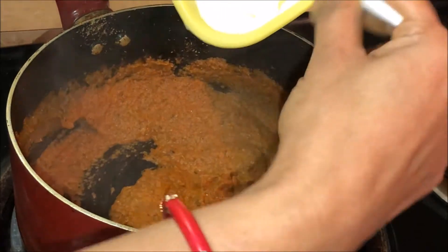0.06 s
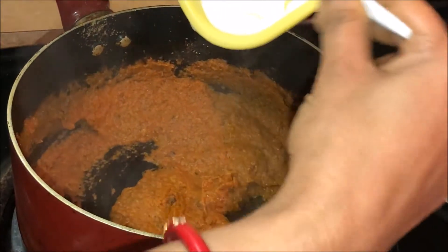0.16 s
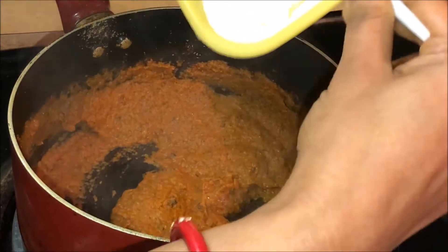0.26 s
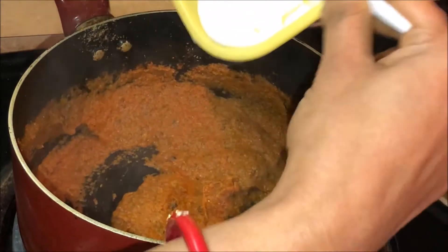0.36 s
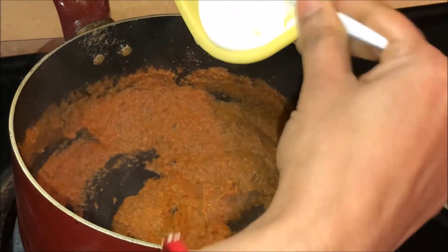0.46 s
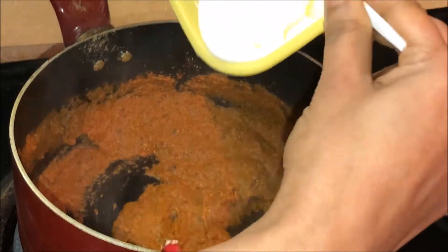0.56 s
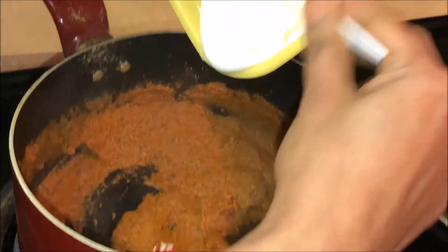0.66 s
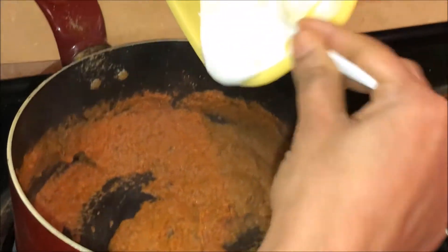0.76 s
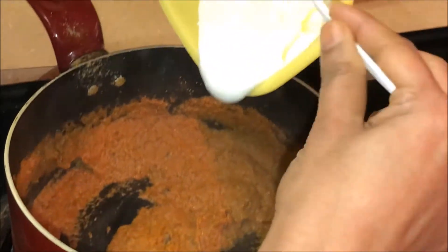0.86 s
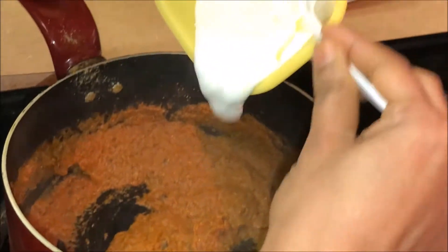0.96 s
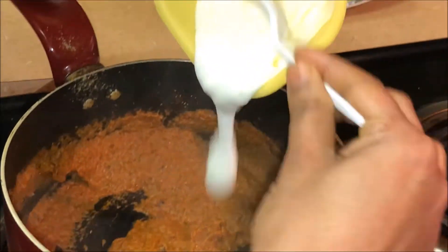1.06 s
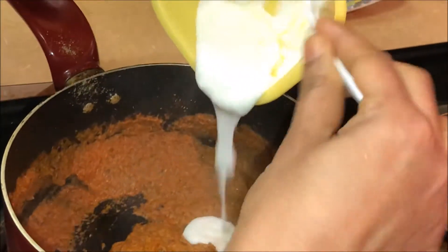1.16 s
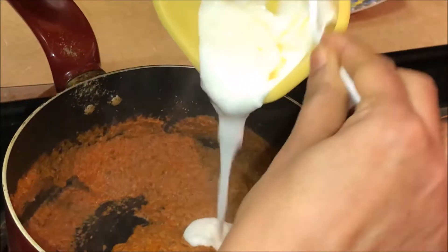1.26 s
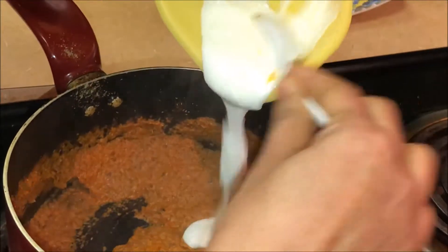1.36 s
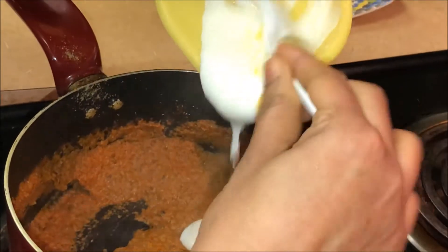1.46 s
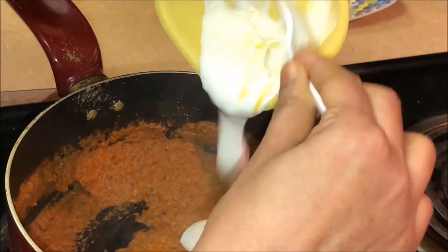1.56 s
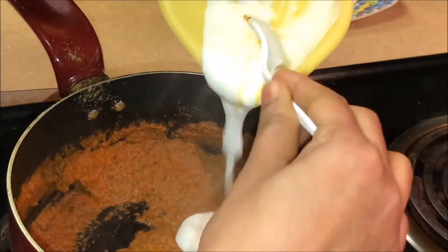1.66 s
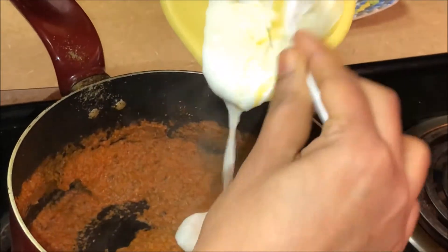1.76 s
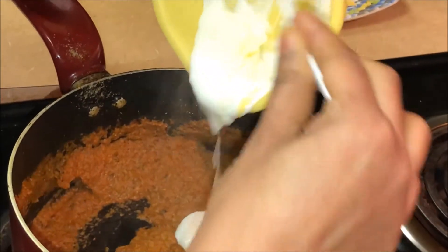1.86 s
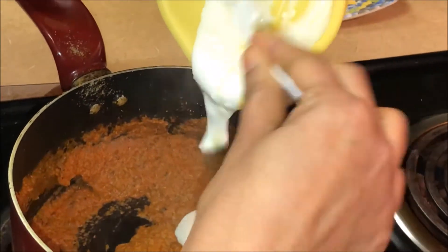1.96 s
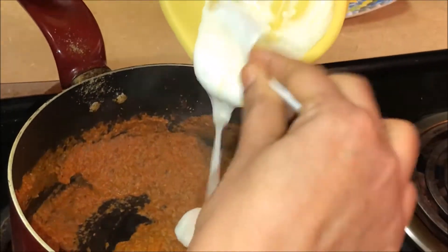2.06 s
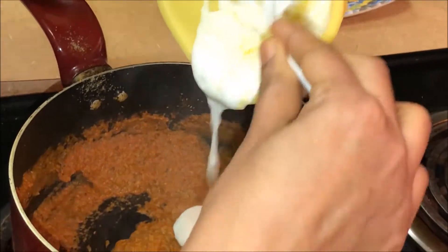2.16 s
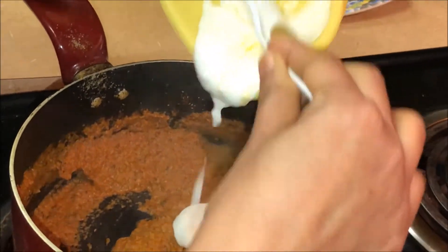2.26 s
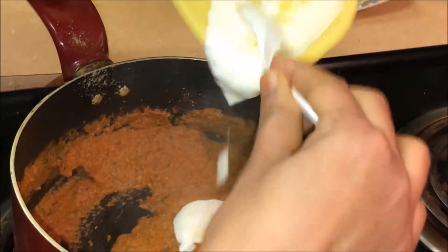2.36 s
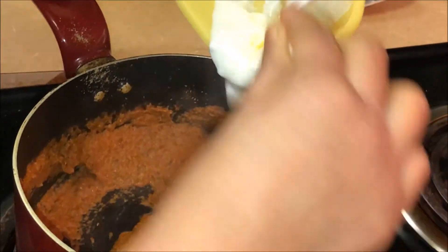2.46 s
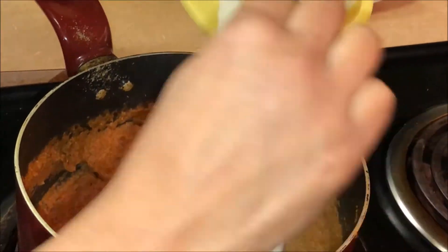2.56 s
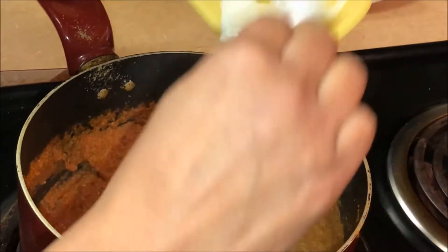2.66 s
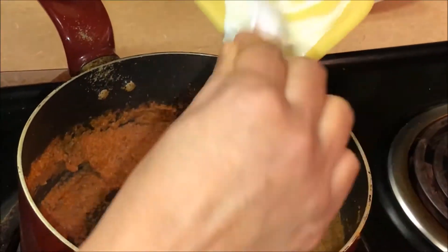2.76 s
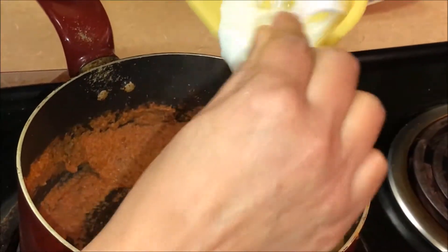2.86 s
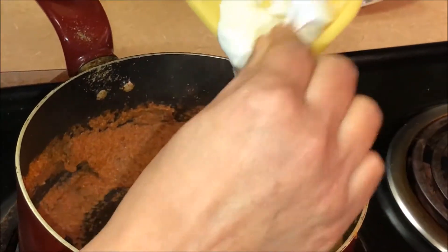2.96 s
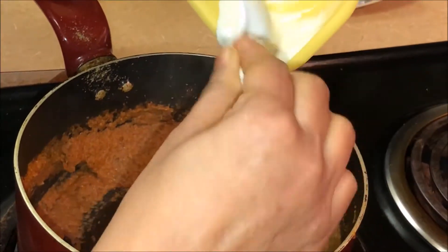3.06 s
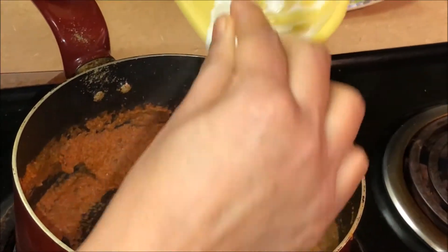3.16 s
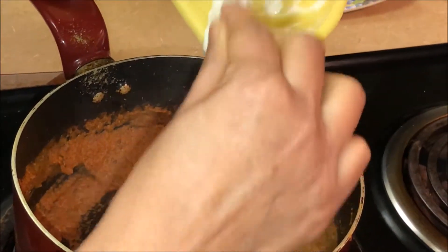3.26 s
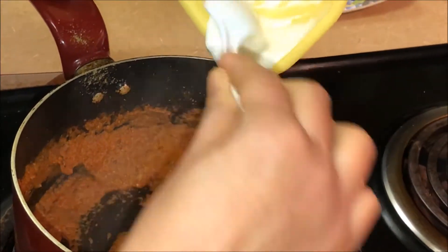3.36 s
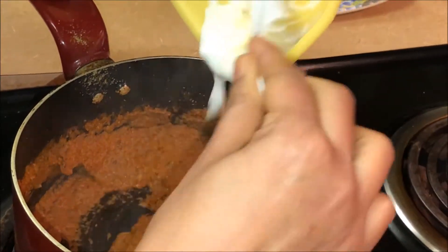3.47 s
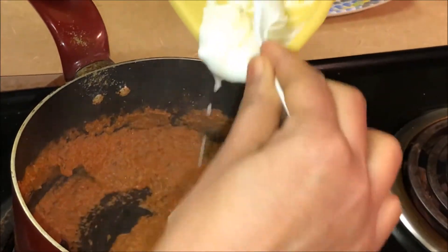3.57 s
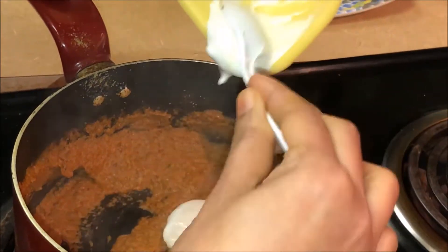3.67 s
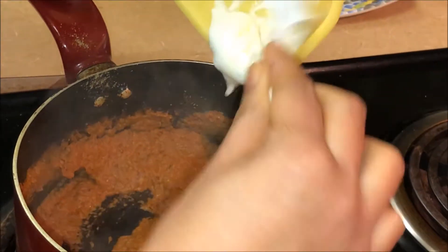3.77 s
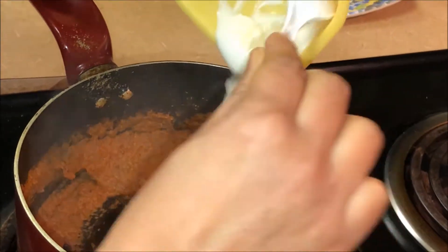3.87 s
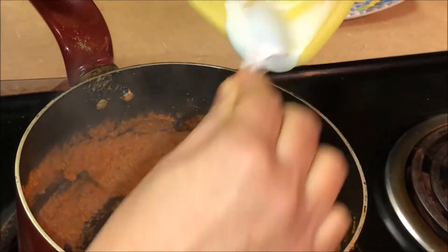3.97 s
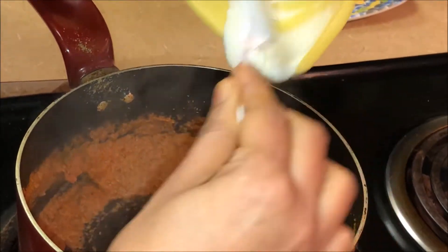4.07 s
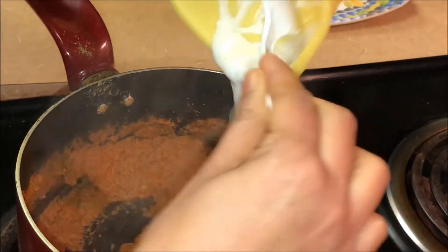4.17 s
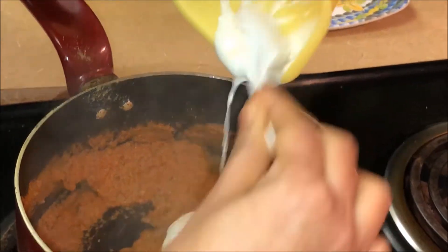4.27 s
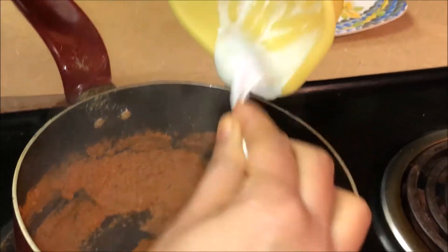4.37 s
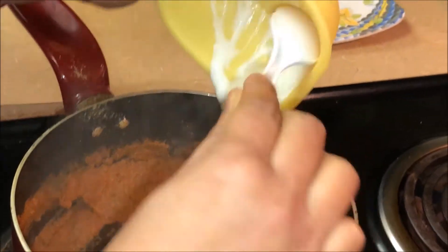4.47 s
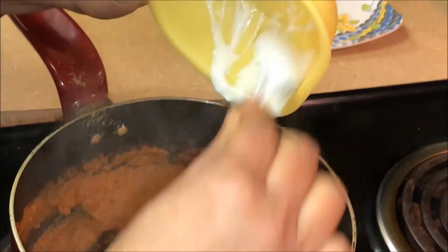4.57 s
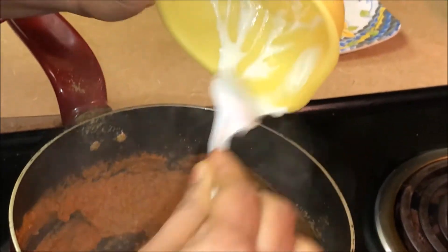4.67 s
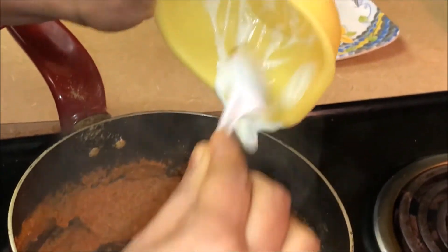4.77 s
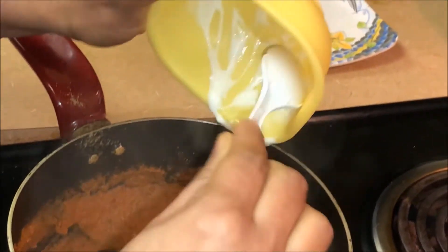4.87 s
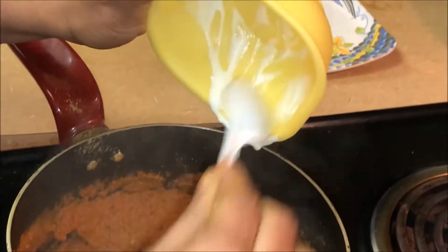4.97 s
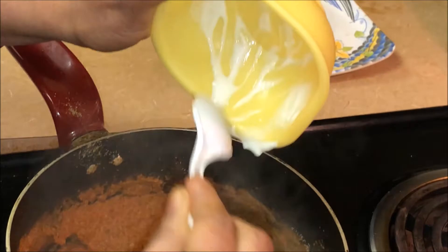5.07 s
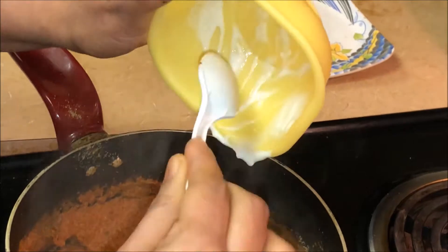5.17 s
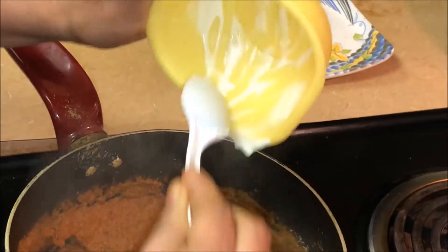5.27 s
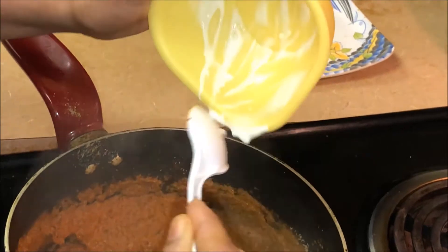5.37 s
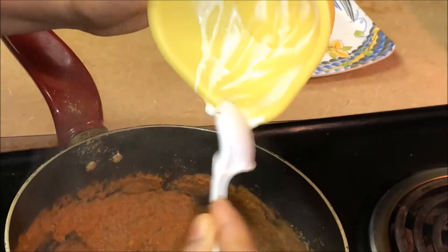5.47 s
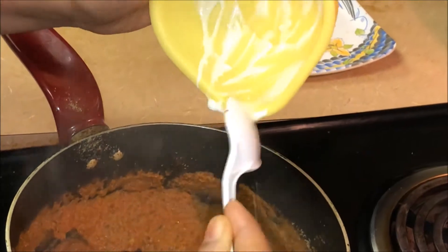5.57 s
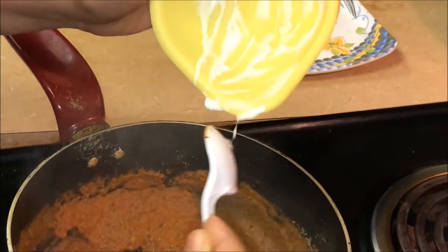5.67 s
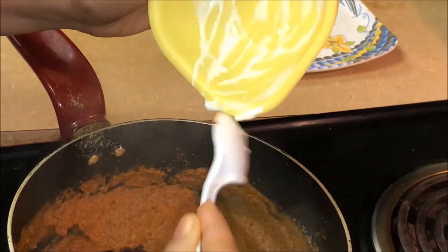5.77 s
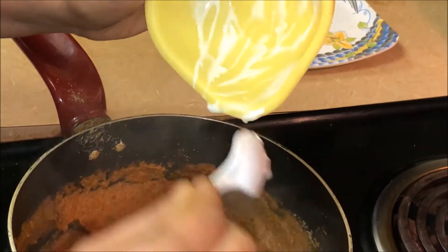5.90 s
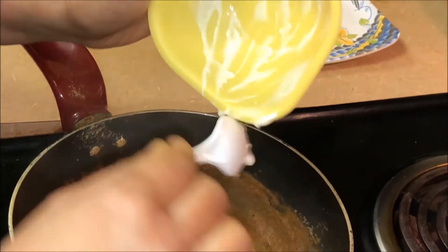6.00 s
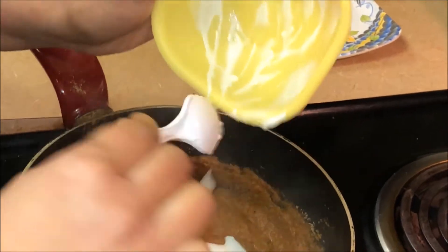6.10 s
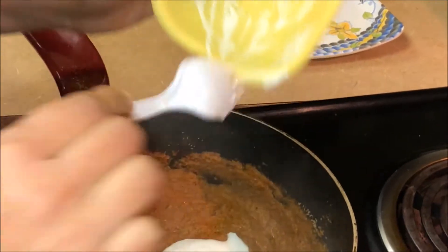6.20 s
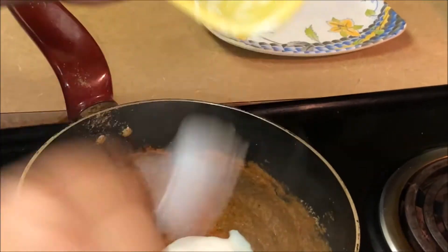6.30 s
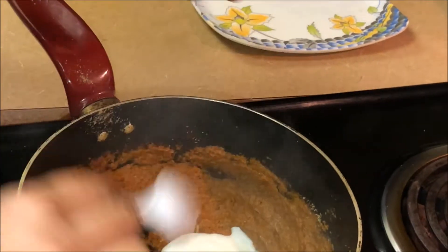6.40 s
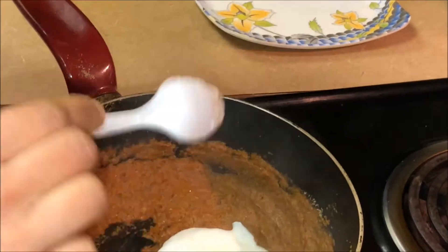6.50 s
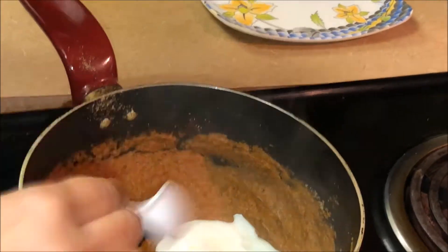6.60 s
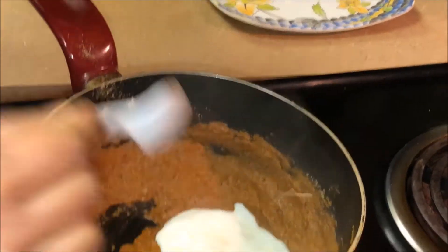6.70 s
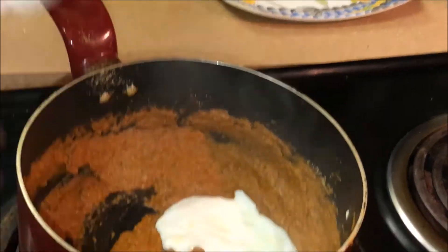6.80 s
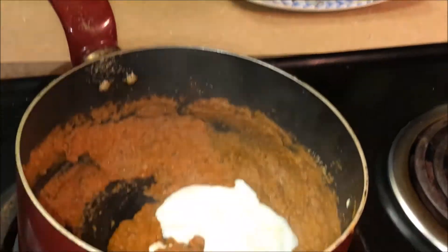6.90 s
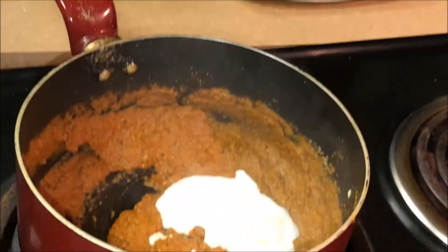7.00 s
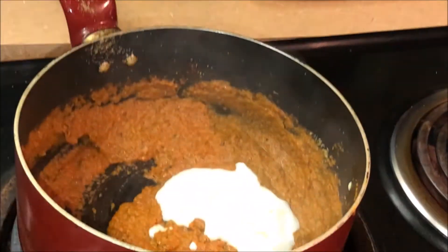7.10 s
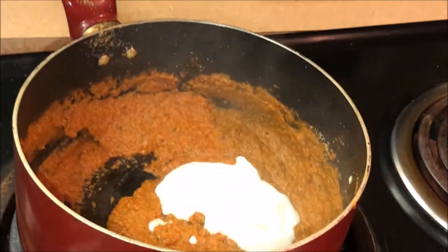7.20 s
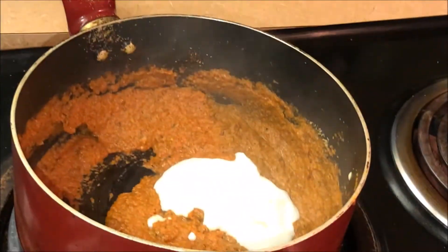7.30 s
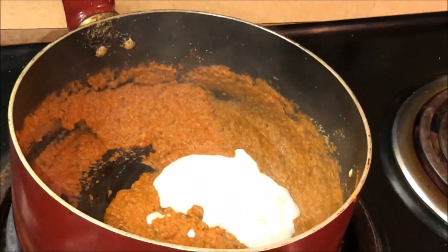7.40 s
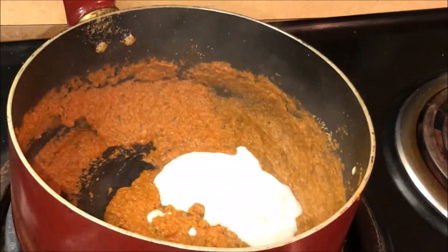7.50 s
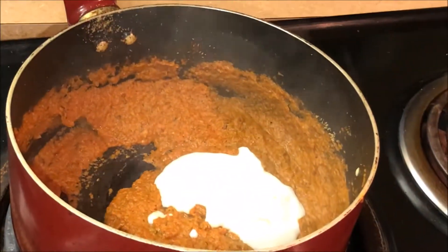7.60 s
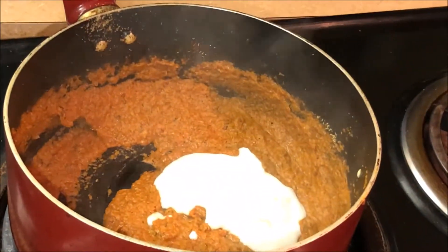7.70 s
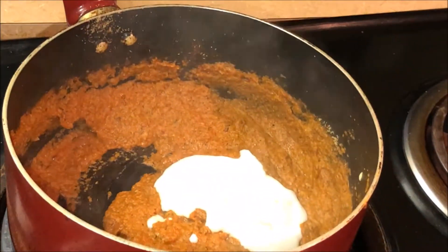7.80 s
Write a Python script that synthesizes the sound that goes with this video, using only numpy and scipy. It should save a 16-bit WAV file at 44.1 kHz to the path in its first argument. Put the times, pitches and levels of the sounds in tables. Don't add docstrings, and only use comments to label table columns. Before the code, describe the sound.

Spoon on plastic tub, recorded near with a phone microphone: quick hollow knocks, dry little scrapes, wet hissy smears and a tiny squeak near five seconds. Thick lumps plop softly into a pan. Hands and sleeve rustle low at first. After six seconds the scraping stops, leaving faint simmer, appliance hum and a small cluster of taps just after seven. Short bright kitchen reflections.

```python
import sys
import numpy as np
from scipy import signal
from scipy.fft import rfft, irfft, next_fast_len
from scipy.io import wavfile
from scipy.ndimage import uniform_filter1d

SR = 44100
rng = np.random.default_rng(int(sys.argv[2]) if len(sys.argv) > 2 else 0)


def undo_db(level):
    steps = np.asarray(level, float) / 20
    return 10 ** steps


def bounce(signal):
    frames = np.transpose(np.atleast_2d(signal))
    limited = np.clip(frames, -1, 1)
    pcm = np.round(limited * 32767).astype(np.int16)
    wavfile.write(sys.argv[1], SR, pcm)


N = 345992


def evened(x):
    return x / np.sqrt(np.mean(x ** 2) + 1e-20)


def slow_wander(count, size):
    return evened(uniform_filter1d(rng.standard_normal(count), size=size))


def read(points, hz):
    f, value = np.transpose(points)
    return np.interp(np.log(hz + 1), np.log(f + 1), value)


def curve(rows):
    return np.interp(np.arange(N) / SR, *np.transpose(rows))


def add(mix, s, sound):
    part = mix[round(s * SR):][:len(sound)]
    part += sound[:len(part)]


def resonate(x, hz, width):
    turn = np.exp(2j * np.pi * np.cumsum(hz * np.ones(len(x))) / SR)
    r = np.exp(-np.pi * width / SR)
    smooth = signal.lfilter([1 - r], [1, -r], x / turn + 1e-18)
    return 2 * (turn * smooth).real


def highs(x, hz, order=2):
    return signal.sosfilt(signal.butter(order, hz, "high", fs=SR, output="sos"), x)


# start_s, hollow_peak_db, hollow_hz, strongest_wall_hz, wall_db
CLICKS = [(0.3644, -34, 1450, 3500, -56), (0.6234, -36.5, 1280, 4830, -40),
          (0.7518, -32.5, 1410, 5400, -44), (0.9079, -28, 1580, 5500, -37),
          (1.2356, -32.5, 1380, 3130, -39), (1.4068, -46, 1390, 6420, -48), (1.919, -46, 1190, 6250, -43.5),
          (2.6548, -31, 1380, 3220, -45.5), (3.8579, -18, 1428, 6540, -34.5),
          (3.9887, -23, 1490, 2900, -39.5), (4.217, -29, 1260, 2970, -36.5),
          (4.531, -22, 1440, 2850, -35.5), (4.921, -15.5, 1430, 2920, -32.5),
          (5.548, -30.5, 1420, 3200, -48), (7.134, -44, 1330, 3890, -44.5)]
# start_s, hollow_peak_db, hollow_hz, strongest_wall_hz, wall_db
SLAPS = [(0.2963, -38, 1550, 3950, -47), (.3407, -58, 1270, 5000, -48), (0.3884, -43, 1400, 5300, -47),
         (0.7222, -32, 1370, 3300, -48), (1.4347, -29, 1356, 3210, -33), (1.5711, -34.5, 1580, 3180, -38.5),
         (1.6598, -21.5, 1380, 4700, -31), (1.8786, -30, 1330, 3400, -35), (2.0014, -35, 1370, 5380, -33.5),
         (2.2445, -29, 1490, 3300, -30), (2.3189, -23, 1380, 5800, -28), (2.684, -43, 1390, 3280, -60),
         (2.7265, -26, 1435, 3050, -40), (2.946, -24.5, 1267, 2700, -36), (3.0435, -37, 1600, 5100, -51),
         (3.3374, -31, 1270, 2680, -45), (4.2436, -22, 1330, 2930, -29.5), (5.2851, -15, 1380, 4400, -14),
         (5.6708, -28.5, 1090, 3280, -36), (5.8302, -36.5, 1410, 2950, -50),
         (6.107, -35.5, 1270, 5560, -41.5), (7.121, -30.5, 1180, 5940, -36)]
# start_s, hollow_peak_db, hollow_hz, strongest_wall_hz, wall_db
KNOCKS = [(0.0929, -38, 1400, 4030, -50), (0.408, -38, 1410, 5400, -41), (.6666, -33, 1350, 2840, -40.5),
          (0.983, -21.5, 1485, 3250, -26.5), (1.0565, -27, 1480, 3900, -33), (1.951, -22, 1440, 4200, -31),
          (2.0118, -35, 1390, 3200, -35), (2.3978, -26, 1250, 3000, -40), (2.4062, -29.5, 1430, 4800, -31),
          (3.327, -45, 1450, 2400, -53), (3.5599, -28, 1310, 3200, -29), (3.6274, -19, 1386, 5400, -21),
          (3.7224, -31, 1380, 3600, -52), (4.7438, -23, 1420, 4600, -35), (5.0942, -25.5, 1480, 3110, -31),
          (5.384, -34, 1300, 3900, -36), (7.0933, -35.5, 1190, 5140, -38.5)]
# start_s,
# hollow_peak_db, hollow_hz, strongest_wall_hz, wall_db
PINGS = [(1.202, -60, 1500, 6500, -52), (1.668, -31, 1450, 5600, -44), (2.206, -60, 1400, 2800, -52),
         (3.612, -46, 1300, 3800, -48), (3.744, -38, 1300, 3500, -52), (4.638, -30, 1450, 3100, -52),
         (6.099, -42, 1300, 3200, -52), (6.116, -36, 1350, 3200, -48), (2.2475, -34, 1600, 3800, -37),
         (2.776, -42, 1350, 2700, -58), (6.7, -62, 1500, 4800, -60), (.087, -46, 1400, 3500, -50),
         (5.2853, -40, 1400, 3150, -17), (1.9512, -40, 1440, 2900, -22), (3.628, -40, 1400, 3800, -23),
         (6.142, -50, 1350, 3200, -50), (.375, -44, 1450, 4000, -60), (2.7268, -36, 1650, 2700, -37),
         (1.046, -21, 1470, 3300, -34), (1.052, -18, 1450, 3700, -30), (3.352, -33, 1500, 2900, -46),
         (3.3595, -31, 1450, 2900, -46), (4.7345, -29, 1340, 2850, -33), (4.744, -40, 1420, 3050, -27),
         (4.643, -33, 1500, 3100, -52)]
# start_s, hollow_peak_db, hollow_hz, wall_db
NUDGES = [(.0074, -38.5, 1560, -67), (1.3764, -36, 1280, -52), (2.563, -35, 1230, -54),
          (2.809, -67, 1340, -47.5), (2.9758, -37.5, 1370, -56), (3.125, -43.5, 1410, -55),
          (3.279, -30.5, 1290, -47.5), (3.3029, -46, 1420, -53), (4.0839, -44, 1630, -43.5),
          (4.3865, -31, 1390, -42.5), (5.6367, -45, 1520, -60), (5.663, -32, 1430, -46),
          (6.0356, -53.5, 1210, -57), (6.142, -33.5, 1360, -49), (7.813, -49, 1600, -58)]
CLICK_TICK_DB, SLAP_TICK_DB, KNOCK_TICK_DB = 4.5, -4.5, -25
NUDGE_WALL_HZ = 2950
SOFT_FOCUS_DB = -12


def touches():
    rows = [(*r, r[-1] + CLICK_TICK_DB, 0) for r in CLICKS]
    rows += [(*r, r[-1] + SLAP_TICK_DB, 0) for r in SLAPS]
    rows += [(*r, r[-1] + KNOCK_TICK_DB, 0) for r in KNOCKS]
    rows += [(*r, r[-1] + KNOCK_TICK_DB, SOFT_FOCUS_DB) for r in PINGS]
    for s, hollow_db, hollow_hz, wall_db in NUDGES:
        rows.append((s, hollow_db, hollow_hz, NUDGE_WALL_HZ, wall_db, wall_db + KNOCK_TICK_DB, SOFT_FOCUS_DB))
    return rows


def tick_colour(x):
    softened = signal.lfilter([1], [1, -.8], signal.lfilter([1], [1, -.8], x))
    return evened(highs(softened, 6100))


# pitch_hz, width_hz, level_db
WALLS = [(3110, 410, -4), (4110, 360, -5.5), (5600, 340, -6.5), (6330, 190, -19), (6670, 640, -41),
         (8900, 700, -29)]
# time_s, level_under_hollow_db
THUD = [(0, -30), (2.6, -18), (4.3, -25.5), (5.0, -34), (5.28, -46), (5.6, -22.5), (7.8, -20)]
TICK_TOP_DB = -27.5
CUSHION_S_PER_DB, HARD_DB = .00005, -24


def taps():
    out, t = np.zeros(N), np.arange(1800) / SR
    hz, width, db = np.transpose(WALLS)
    modes = len(hz)
    rows = touches()
    chance = rng.random((len(rows), 2 * modes + 4))
    grit = rng.standard_normal((len(rows), 2, len(t)))
    for row, luck, noise in zip(rows, chance, grit):
        s, hollow_db, hollow_hz, wall_hz, wall_db, tick_db, others_db = row
        swell = t / 0.0014
        hollow = np.sin(2 * np.pi * (hollow_hz * t + luck[-1]))
        second_hz = hollow_hz * (1.143 + 0.174 * luck[-2])
        hollow += 0.24 * np.sin(2 * np.pi * (second_hz * t + luck[-3]))
        hollow = highs((swell * np.exp(1 - swell)) ** 2 * hollow, 1120, order=8)

        f = np.append(hz * (1.0 + 0.018 * luck[:modes]), wall_hz)[:, None]
        distance = abs(np.log2(hz / wall_hz))
        mode_db = db + others_db + 1.5 - 3 * distance + 3.5 * luck[modes:-4]
        gain = undo_db(np.append(mode_db, 3.5))[:, None]
        fade = np.exp(-np.pi * np.append(width, 380)[:, None] * .74 * t)
        phase = 0.26 * luck[modes:-3, None]
        wall = (gain * fade * np.sin(2 * np.pi * (f * t + phase))).sum(0)
        wall *= 1 - np.exp(-t / (.0001 + CUSHION_S_PER_DB * max(HARD_DB - wall_db, 0)))

        crack = evened(resonate(highs(noise[0], 1200), 3270, 2100))
        crack *= np.exp(-t / 0.0051) + 0.062 * np.exp(-t / 0.024)
        wall = highs(wall / abs(wall).max() + 0.127 * crack, 1340, order=4)
        tick = tick_colour(noise[1]) * (np.exp(-t / 0.00065) + 0.33 * np.exp(-t / 0.0049))
        thud = 1.6 * np.exp(-t / 0.0011) * np.sin(2 * np.pi * 480 * t)
        thud += 1.6 * np.exp(-t / 0.0032) * np.sin(2 * np.pi * 870 * t)

        touch = undo_db(hollow_db) * (hollow + undo_db(np.interp(s, *np.transpose(THUD))) * thud)
        touch += undo_db(wall_db + 11 + .45 * others_db) * wall
        touch += undo_db(min(tick_db, TICK_TOP_DB) + 7) * tick
        add(out, s, touch)
    return out


def slips(count):
    clumps = undo_db(2.66 * slow_wander(count, 250))
    grains = rng.standard_normal(count) * undo_db(0.35 * np.minimum(rng.exponential(1, count), 3))
    grains *= rng.random(count) < 2500 / SR
    return clumps * (evened(grains) + 1.5 * rng.standard_normal(count))


def tub(drive, pitch, shift, wall_hz):
    hollow = resonate(resonate(drive, pitch, 450), pitch, 450) + 0.19 * resonate(drive, 1.3 * pitch, 240)
    walls = 0.9 * resonate(resonate(drive, wall_hz, 500), wall_hz, 500) + 0.068 * highs(drive, 2400)
    for f, width, db in WALLS:
        ring = resonate(resonate(drive, f * shift, 2.2 * width), f * shift, 2.2 * width)
        walls = walls + undo_db(0.43 * db) * ring
    film = highs(signal.lfilter([1], [1, -.6], drive), 4500)
    return evened(highs(hollow, 1060, order=8)), evened(walls), evened(film)


# time_s, pitch_hz
HOLLOW = [(0, 1350), (1.04, 1576), (1.3, 1396), (3.4, 1334), (3.9, 1450), (4.33, 1330), (4.6, 1440),
          (5.1, 1510), (5.7, 1400), (6.0, 1240), (7.14, 1257), (7.3, 1390), (7.85, 1490)]
# most_pressure_s, level_db, length_s
STROKES = [(.01, -49.5, 0.25), (0.663, -69.5, 0.082), (1.095, -56.5, 0.36), (1.37, -53, 0.22),
           (1.675, -50.5, 0.17), (2.04, -55, 0.099), (2.496, -81, 0.42), (3.029, -51.5, 0.088),
           (3.369, -49.5, 0.09), (3.692, -51, 0.12), (4.001, -48.5, 0.12), (4.346, -44.5, 0.068),
           (4.634, -46.5, 0.14), (5.05, -51, 0.13), (5.4, -55, 0.13), (5.67, -71, 0.12),
           (7.192, -56.5, 0.23), (7.82, -66, 0.2)]
LEAN_IN, LET_GO = 0.25, 0.33
STROKE_HOLLOW_DB, STROKE_HISS_DB = -3.5, -40
REST_DB, REST_HOLLOW_DB, REST_HISS_DB = -69, 2, 3.5
LIFT_S, LIFTED_DB = 5.4, -1


def drag():
    t = np.arange(N) / SR
    push = np.zeros(N)
    for s, db, length in STROKES:
        away = np.maximum((s - t) / LEAN_IN, (t - s) / LET_GO)
        push += undo_db(db) * np.exp(-away / length)
    rest = undo_db(REST_DB + LIFTED_DB * (t > LIFT_S))
    wander = slow_wander(N, 3500)
    pitch = curve(HOLLOW) * (1 + 0.085 * wander)
    hollow, walls, hiss = tub(slips(N), pitch, 1 + 0.08 * wander[::-1], 3600 + 300 * wander)
    out = (rest * undo_db(REST_HOLLOW_DB) + push * undo_db(STROKE_HOLLOW_DB)) * hollow
    out += (rest + push) * walls
    return out + (undo_db(REST_DB + REST_HISS_DB) + push * undo_db(STROKE_HISS_DB)) * hiss


# start_s, hollow_db, wall_db, length_s, strongest_wall_hz
JUDDERS = [(0.062, -48, -34.5, 0.054, 5000), (0.393, -45, -34.5, 0.056, 3300),
           (0.455, -45, -34, 0.052, 5500), (1.0403, -16, -13, .028, 3800), (1.05, -11, -13, 0.017, 3400),
           (1.054, -22, -31, .015, 5300), (1.659, -30, -34, 0.021, 4700), (1.924, -40, -36, 0.066, 4600),
           (2.074, -43, -35.5, 0.047, 5100), (2.291, -38, -32, .052, 3000), (2.306, -40, -22, .016, 6000),
           (2.389, -34, -30, 0.041, 5000), (3.345, -31, -33.5, 0.038, 2600), (3.372, -55, -36, 0.08, 3700),
           (3.692, -55, -35, 0.088, 3700), (4.306, -52, -28, .043, 4400), (4.36, -37, -38, 0.071, 3100),
           (4.662, -42, -33, 0.074, 3200), (4.701, -51, -33, 0.036, 4300), (5.04, -30, -34, 0.022, 2600),
           (5.0825, -20, -31, 0.023, 3100), (5.369, -48, -32.5, 0.036, 2700),
           (5.648, -25.5, -35, 0.053, 3100), (6.041, -45, -44, 0.061, 5500),
           (6.103, -29, -27.5, 0.04, 5500), (6.121, -35, -40, 0.048, 3200), (6.15, -38, -52, .07, 3100),
           (7.106, -41, -53, 0.019, 4000), (7.1225, -31.5, -35.5, 0.055, 5600),
           (7.15, -44, -42, 0.054, 3800), (7.194, -46, -53, .033, 3500)]
# start_s, hollow_db, hiss_db, length_s
SMEARS = [(.1194, -41, -34.5, 0.059), (0.44, -41, -30.5, 0.049), (.7293, -31, -25.5, 0.027),
          (1.04, -38, -30, 0.027), (1.411, -57, -38, .06), (1.926, -55, -35.5, 0.071),
          (2.0084, -30.5, -31.5, 0.037), (2.735, -43, -39, 0.086), (3.081, -32.5, -35, 0.033),
          (3.096, -56, -32.5, .019), (3.96, -34, -30, 0.023), (3.982, -37, -32, 0.018),
          (4.315, -57, -35, 0.062), (4.628, -25, -35, 0.058)]
JUDDER_HISS_DB, SMEAR_WALL_DB = -16, -13.5


def rubs():
    out, t = np.zeros(N), np.arange(5000) / SR
    rows = [(s, low, db, db + JUDDER_HISS_DB, n, hz) for s, low, db, n, hz in JUDDERS]
    rows += [(s, low, db + SMEAR_WALL_DB, db, n, 6000) for s, low, db, n in SMEARS]
    for s, hollow_db, wall_db, hiss_db, length, wall_hz in rows:
        pitch = np.interp(s, *np.transpose(HOLLOW))
        hollow, walls, hiss = tub(slips(len(t)), pitch, rng.uniform(.94, 1.06), wall_hz)
        u = t / np.clip(length, .005, .07)
        stroke = (1 - np.exp(-u / 0.17)) * np.exp(-(1.665 * u) ** 2)
        rub = undo_db(hollow_db - 12.5) * hollow + undo_db(wall_db - 10.5) * walls + undo_db(hiss_db - 7) * hiss
        add(out, s, stroke * rub)
    return out


# time_s, pitch_hz, level_db
SQUEAK = [
    (4.926, 1840, -22),
    (4.94, 1820, -49),
    (4.955, 1663, -58),
    (4.975, 1846, -47),
    (4.995, 1980, -62),
    (5.02, 1900, -62),
]


def squeak():
    s, hz, db = np.transpose(SQUEAK)
    t, out = np.arange(s[0], s[-1], 1 / SR), np.zeros(N)
    pitch = np.interp(t, s, hz)
    tone = np.sin(2 * np.pi * np.cumsum(pitch) / SR)
    tone += 0.24 * evened(resonate(rng.standard_normal(len(t)), pitch, 120))
    add(out, s[0], undo_db(np.interp(t, s, db)) * tone * signal.windows.tukey(len(t), .1))
    return out


# start_s, peak_db, pitch_hz
PLOPS = [(0.842, -52, 706), (0.842, -56, 360), (2.015, -50, 150), (0.94, -50, 620), (1.035, -53, 397),
         (1.148, -50, 613), (1.327, -48.5, 625), (1.454, -50, 590), (1.58, -50, 623), (1.706, -49, 630),
         (1.87, -54, 600), (2.026, -48, 620), (2.296, -48, 603), (2.592, -49, 612), (2.78, -55.5, 680),
         (3.087, -61, 694), (3.948, -57, 289), (6.1, -55, 600), (6.565, -60, 800), (6.708, -59, 800),
         (6.905, -59, 810), (7.472, -59, 570), (7.8, -60, 700)]
PAN_HZ, PAN_DB, PAN_RING_S = 462, -6, .026


def plops():
    out, t = np.zeros(N), np.arange(4000) / SR
    for s, db, hz in PLOPS:
        swell = t / .0055
        pitch = hz * (1.06 - 0.3 * np.exp(-t / 0.005))
        bubble = swell * np.exp(1 - swell) * np.sin(2 * np.pi * np.cumsum(pitch) / SR)
        pan = undo_db(PAN_DB - 30 * abs(np.log2(hz / 615))) * np.sin(2 * np.pi * PAN_HZ * t)
        pan *= (1 - np.exp(-t / .003)) * np.exp(-t / PAN_RING_S)
        fizz = evened(resonate(rng.standard_normal(len(t)), hz, 200)) * (t / .016) * np.exp(1 - t / .016)
        add(out, s, undo_db(db) * (.85 * bubble + pan + .25 * fizz))
    return out


# pitch_hz, level_db
WET = [(500, -3.5), (1400, -1), (2300, 1.5), (4000, -2), (9000, -1)]
# pitch_hz, decay_s
KITCHEN = [(500, 0.96), (1400, 0.44), (4000, 0.443), (12000, 0.24)]


def tail():
    sparse = np.zeros(SR // 2)
    at = np.arange(400, SR // 2 - 20, 20)
    sparse[at + rng.integers(0, 20, len(at))] = rng.choice([-1., 1.], len(at))
    hz, t, z = signal.stft(sparse, SR, nperseg=256)
    level_db = read(WET, hz)[:, None] - 60 * t / read(KITCHEN, hz)[:, None]
    out = signal.istft(z * undo_db(level_db), SR, nperseg=256)[1]
    return out * undo_db(-18) / np.linalg.norm(out)


# delay_s, level_db
ECHOES = [(.0037, -19), (.006, -16), (.009, -24), (0.011, -24)]
SIDEWAYS_HZ = [-420, 0, 380]


def kitchen(x):
    near = np.zeros(SR // 50)
    for s, db in ECHOES:
        add(near, s, np.array([undo_db(db)]))
    out = signal.oaconvolve(x, near)[:N]
    walls = signal.sosfiltfilt(signal.butter(4, 2300, "high", fs=SR, output="sos"), x)
    turning = signal.hilbert(walls, next_fast_len(N))[:N]
    for hz in SIDEWAYS_HZ:
        shifted = (turning * np.exp(2j * np.pi * hz * np.arange(N) / SR)).real
        out += signal.fftconvolve(x - walls + shifted, tail())[:N]
    return out


# time_s, level_db
HANDS = [
    (0.0, -59),
    (0.39, -68.5),
    (1.92, -67),
    (3.3, -77),
    (3.95, -64.5),
    (4.43, -76),
    (7.85, -75),
]


def hands():
    lumps = undo_db(3.9 * slow_wander(N, 1500))
    rustle = resonate(resonate(rng.standard_normal(N), 325, 390), 325, 390)
    return undo_db(curve(HANDS)) * evened(lumps * rustle)


# pitch_hz, level_per_hz_db
ROOM_TONE = [(24, -42), (40, 4), (111, -4), (143, -3.5), (288, -9), (361, -9), (566, -5.5), (865, -4.5),
             (1230, -14), (1500, -6), (1830, -9.5), (4730, -9.5), (6710, -17), (15700, -19.5)]
ROOM_DB = -59.5
# pitch_hz, level_db
HUM = [(54, -87), (108, -76), (120, -71.5), (1540, -84)]


def room_tone():
    frames, hz = N // 512 + 5, np.fft.rfftfreq(2048, 1 / SR)
    a, b, patches = rng.standard_normal((frames, 1025, 3)).T
    patches = uniform_filter1d(patches, size=50, axis=0)
    patches = evened(uniform_filter1d(patches, size=5, axis=1))
    z = (a + 1j * b) * undo_db(read(ROOM_TONE, hz)[:, None] + 1.3 * patches)
    out = undo_db(ROOM_DB) * evened(signal.istft(z, nperseg=2048, noverlap=1536)[1][:N])
    for f, db in HUM:
        waver = slow_wander(N, 5000)
        hum = np.sin(2 * np.pi * np.cumsum(f * (1 + 0.0112 * waver)) / SR)
        out += undo_db(db + 3.5 + 2.0 * waver) * hum
    return out


def scene():
    near = taps() + drag() + rubs() + plops() + squeak()
    return (near + kitchen(near) + hands() + room_tone())[None]


# middle_s, length_s
STARVED = [(.957, .032), (.995, .022), (1.974, .026), (2.033, .048), (3.537, .034), (3.876, .024),
           (4.164, .07)]
# middle_s, length_s
PINCHED = [(.276, .034), (.419, .026), (.487, .02), (1.316, .018), (1.652, .014), (2.768, .018),
           (2.981, .022), (3.066, .02), (3.237, .026), (3.429, .018), (3.966, .022), (4.58, .018),
           (4.986, .018), (6.077, .026), (6.245, .022), (6.331, .024), (7.113, .012), (7.717, .022)]
PINCH_DB = -16
KEPT_SHARE_S = .0012


def thin_out(x):
    out = x.copy()
    stretches = [(*r, 0) for r in STARVED] + [(*r, undo_db(PINCH_DB)) for r in PINCHED]
    for s, length, left in stretches:
        half = round(length * SR / 2)
        span = slice(round(s * SR) - half, round(s * SR) + half)
        z = rfft(out[span] * signal.windows.tukey(2 * half, .8))
        heard = abs(z) / uniform_filter1d(abs(z), size=round(length * 2500)) ** .55
        kept = heard >= np.quantile(heard, 1 - KEPT_SHARE_S / length)
        out[span] += irfft(z * (1.7 * kept - 1 + left))
    return out


def band_limit(x):
    return signal.sosfilt(signal.butter(12, 17090, fs=SR, output="sos"), x)


def record(dry):
    x = highs(dry[0], 46, order=6)
    body = signal.oaconvolve(x, signal.firwin(1023, 15850, fs=SR), "same")
    top = signal.oaconvolve(x, signal.firwin(1023, [15850, 16950], pass_zero=False, fs=SR), "same")
    loud = uniform_filter1d(top ** 2, size=300) > undo_db(-56) ** 2
    x = body + undo_db(-21) * top * uniform_filter1d(1. * loud, size=200)
    mix = thin_out(x)[None]
    return band_limit(mix)


dry = scene()
out = record(dry)
bounce(out)
```